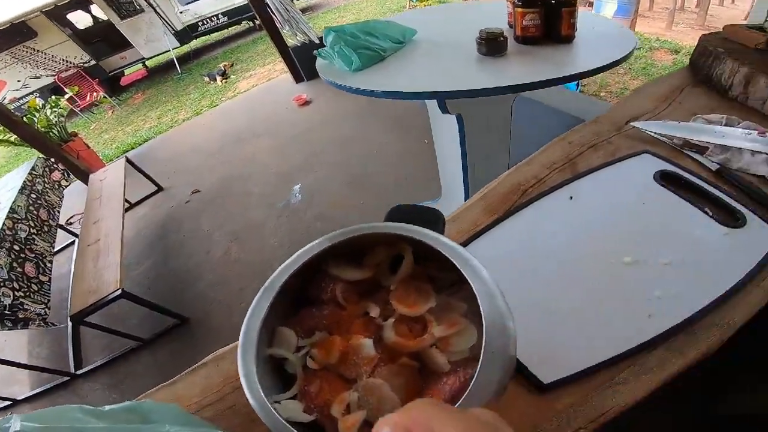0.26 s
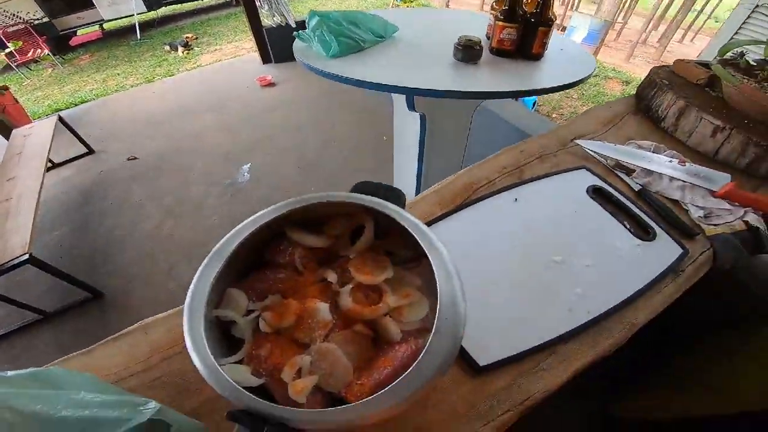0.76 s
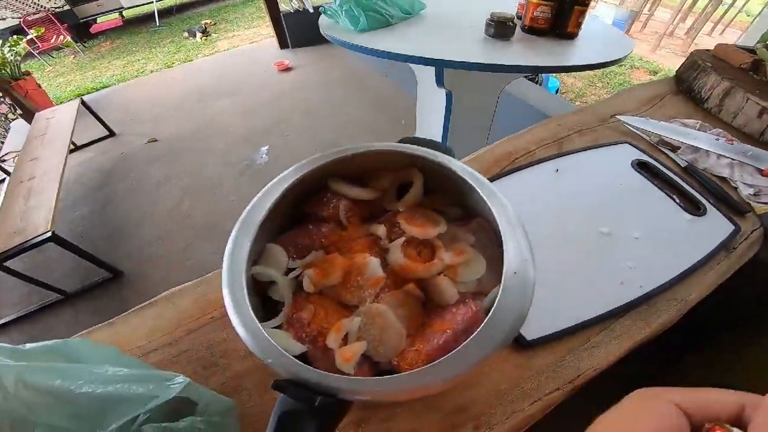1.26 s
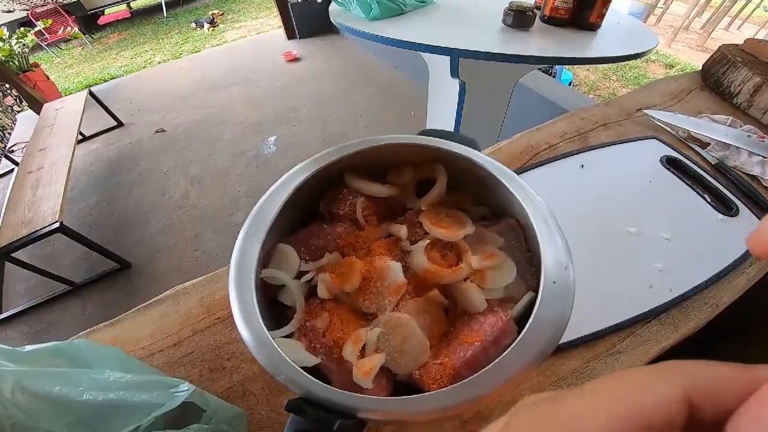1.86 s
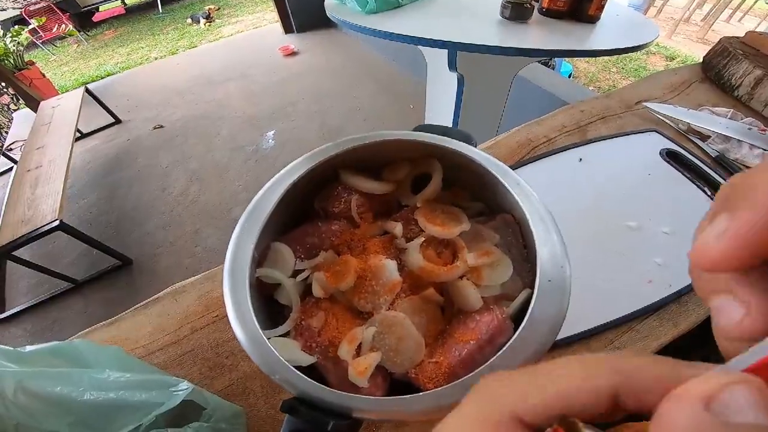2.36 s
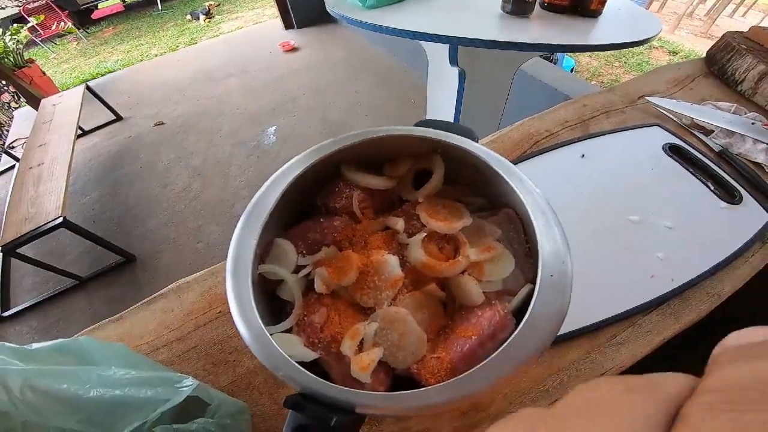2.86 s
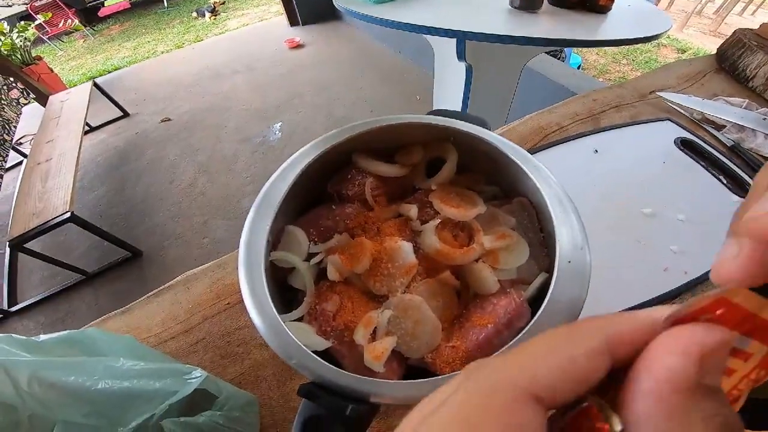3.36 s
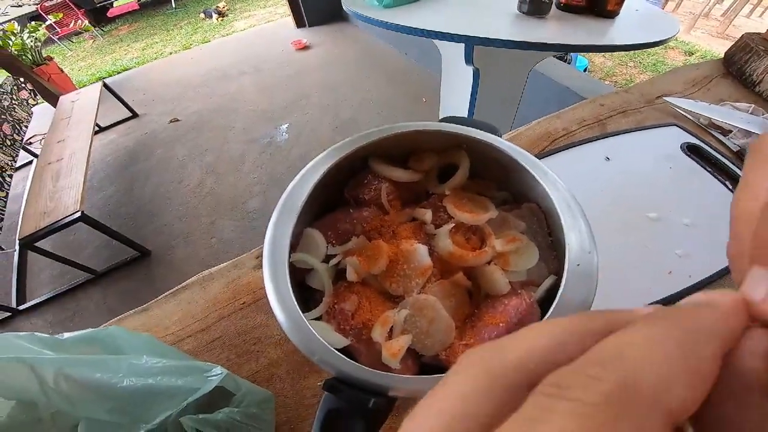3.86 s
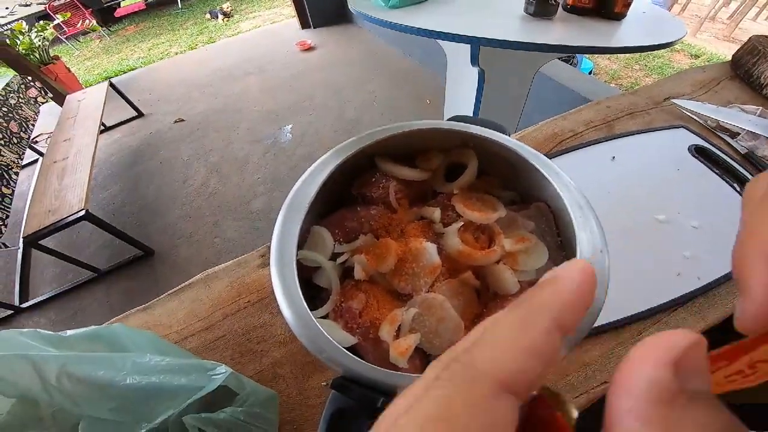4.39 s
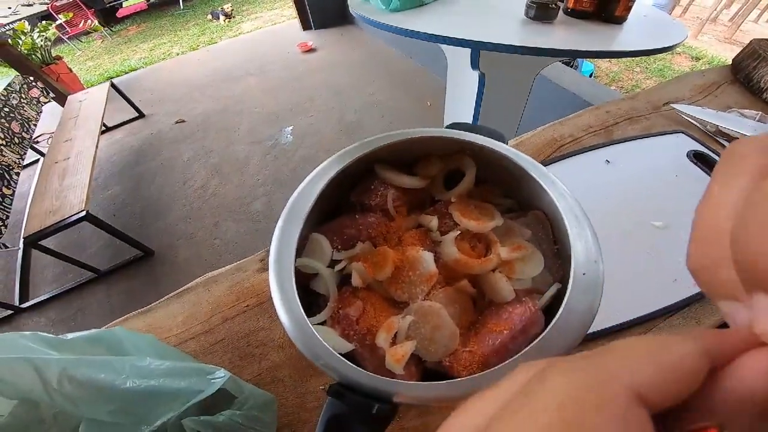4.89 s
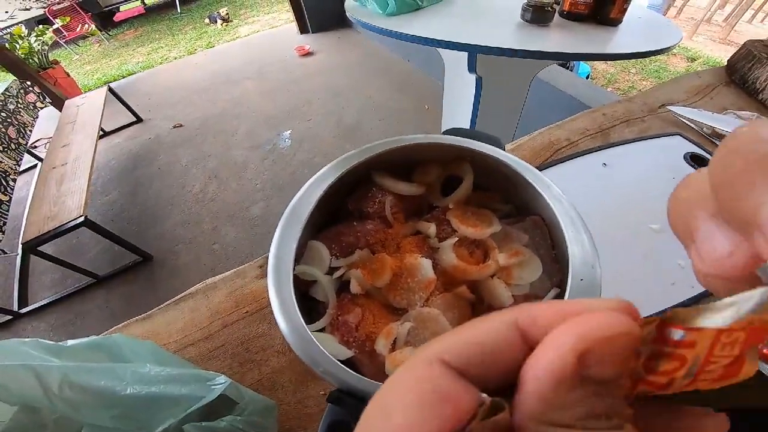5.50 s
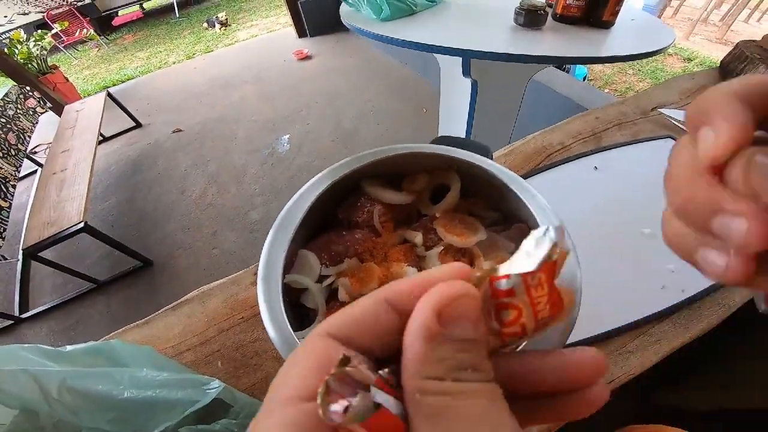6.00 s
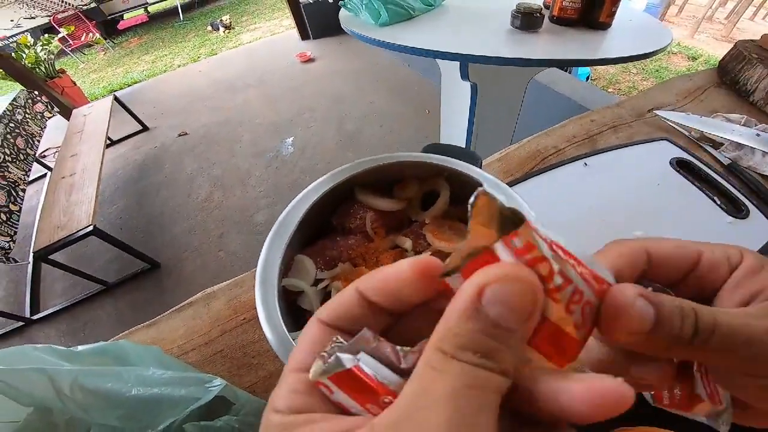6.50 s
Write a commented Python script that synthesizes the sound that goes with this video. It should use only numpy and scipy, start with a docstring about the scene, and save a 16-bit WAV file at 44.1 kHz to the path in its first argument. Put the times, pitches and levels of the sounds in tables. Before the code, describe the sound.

Sparse foil ticks open the scene, followed by soft, deep bumps and brief rubbing against the camera. Then fingers squeeze and tear the thin packet: irregular runs of fine bright crackle punctuated by hard little snaps, a thinner patch in the middle, and a thick flurry later. Close, dry, right-leaning stereo with short porch reflections and very quiet outdoor noise.

```python
"""On an open porch, hands crease and tear open a small foil sachet close to a body-worn two-port camera microphone.
Each squeeze of the fingers sets off a run of fine crackle, made of many tiny ringing facets; large facets buckle
with sharp snaps and drag their neighbours along. Dull knocks (low modes) and cloth rubbing (rumble and friction
noise) reach the camera through its mount. Sliding swishes, short reflections and faint outdoor air lie underneath."""
import sys
import numpy as np
from scipy import signal
from scipy.fft import rfft, irfft, next_fast_len
from scipy.io import wavfile
from scipy.ndimage import uniform_filter1d

SR = 44100
rng = np.random.default_rng(int(sys.argv[2]) if len(sys.argv) > 2 else 0)


def transcribe(u):
    """Save the signal u as a 16-bit wav file named by the first command-line argument.

    u: samples, shape (n,) or (channels, n), limited to [-1, 1]; the rate is SR.
    q: integer samples, one column per channel.
    """
    v = np.clip(np.atleast_2d(u).T, -1, 1)
    q = np.round(v * 32767).astype(np.int16)
    wavfile.write(sys.argv[1], SR, q)


N = 297542
TIME = np.arange(N) / SR

# large facets buckling: t/s, relative energy level/dB, facet resonance f/Hz
FACET_SNAPS = [(0.0106, -15, 2760), (0.0817, -18, 3160), (0.1129, -3.5, 4230), (0.123, -8.5, 2830.0),
               (0.2791, -10, 4970), (0.3073, -4, 5070), (0.3514, -12, 2730), (0.392, -12, 6050),
               (0.5343, -10, 4570), (0.666, -12.5, 1300), (0.7059, -11.5, 5530), (1.204, -12, 1280),
               (1.2292, -16, 1350), (1.245, -9.5, 1180), (1.4316, -18.5, 4370), (1.5, -15.5, 3270),
               (1.527, -12, 5200), (1.5957, -12, 3640.0), (1.6142, 1.5, 4000), (1.682, -3, 3700),
               (1.6873, 1, 5550), (1.7038, -11.5, 4400), (1.7143, -10, 2900), (1.7689, -2.5, 2650),
               (1.7961, 2, 4030), (1.8628, 0.5, 3300), (1.9241, -7, 3220), (1.9628, -5.5, 3060),
               (1.9934, -12.5, 4700), (2.0155, -4, 3540.0), (2.0759, -1.5, 3200), (2.1115, -9.0, 3250),
               (2.1263, -5, 2380), (2.1336, -6.5, 5220.0), (2.1447, 3, 5220.0), (2.16, -1.5, 3440.0),
               (2.1877, -4.5, 2470), (2.2137, -3.5, 2500), (2.2348, -10, 4810.0), (2.2451, 2.5, 2500),
               (2.3502, -9.5, 5080.0), (2.3988, -5.5, 4870), (2.4676, 1.5, 4050), (2.509, -15.5, 6170.0),
               (2.5458, -2, 6740), (2.5593, 2.5, 3350.0), (2.5951, -6.5, 3260.0), (2.626, -0.5, 4810.0),
               (2.6412, -2, 4940.0), (2.6565, -4.5, 4940.0), (2.7139, -6, 5680.0), (2.7245, -5.5, 5410),
               (2.7736, -5.5, 2040), (2.8196, -2.5, 4100), (2.8405, -9, 6000.0), (2.8616, -1.5, 4700),
               (2.934, -6.5, 5840.0), (2.96, -8, 4550.0), (2.9684, -6, 3960.0), (3.038, -2.5, 3540.0),
               (3.1163, -9, 4440), (3.1324, -1, 2120), (3.1405, 1.5, 3900), (3.17, -0.5, 1520),
               (3.1809, 6, 2040), (3.1919, 0.5, 2100), (3.2011, -3.5, 3670), (3.301, -9.5, 3800),
               (3.3482, -12, 3230), (3.3668, -12.5, 3150), (3.551, -11, 4400), (3.6206, -8, 3170.0),
               (3.6363, -5.5, 3240), (3.669, -3.5, 3180), (3.6927, -6.5, 5150), (3.7164, -5.5, 5120),
               (3.917, -3.5, 5100), (3.987, -8, 5680.0), (4.0301, -9.0, 1920.0), (4.0725, -7.5, 5800),
               (4.171, -11.5, 5170), (4.3918, -5, 7400), (4.4674, -11, 1456), (4.4958, -2.5, 4260),
               (4.6156, -1, 6100), (4.6485, -14, 4030), (4.657, -7.5, 5680.0), (4.7931, -8, 5830),
               (4.8422, -8, 4810.0), (4.8507, -6, 7440), (4.857, -2.0, 6400), (4.9234, -1.5, 4600),
               (4.9347, 1, 3800), (4.9988, -2.5, 5080.0), (5.015, -6, 4130), (5.0569, -3, 5900),
               (5.0678, -10, 5520.0), (5.0879, 1, 5840.0), (5.0947, -2, 4400), (5.1163, 1, 3260.0),
               (5.1359, 1.5, 6100), (5.151, -2, 3850.0), (5.1855, -5.0, 4810.0), (5.2495, -7, 3220),
               (5.2682, 0.5, 5160), (5.2817, 1.5, 3870), (5.3, -9, 5250), (5.319, -4, 5080.0),
               (5.3559, -1, 3100), (5.4026, -2, 3170.0), (5.412, -5, 3960.0), (5.4202, -6.5, 4300.0),
               (5.441, -5, 2910.0), (5.4511, -4, 3740.0), (5.4734, 3, 3600), (5.5094, -4.5, 3140),
               (5.531, -5, 3330), (5.5521, 0, 5940), (5.635, 3, 2830.0), (5.6496, -0.5, 2170),
               (5.674, -9, 7500.0), (5.706, -4, 4500), (5.754, -10, 5520.0), (5.771, -10.5, 4570),
               (5.8324, -12.5, 2400), (5.8564, -5.5, 2560), (5.8853, 3, 2840), (5.8916, 3.5, 3050),
               (5.897, -1.5, 2450), (5.964, -8.5, 5650), (6.024, -14.5, 2640), (6.12, -3, 3050),
               (6.257, -6, 4670.0), (6.2684, -0.5, 5080.0), (6.346, -0.5, 4070.0), (6.4156, -3.5, 3800),
               (6.42, -3.5, 1270), (6.4449, -14, 4300), (6.5654, -6, 2640), (6.591, -1.5, 3130),
               (6.6187, -5, 3220), (6.6844, -6, 4400)]
# spectrum of foil close to the microphone: f/Hz, relative level/dB
FOIL_SPECTRUM = [(100, 4.5), (300, -4.5), (700, -1), (1000, -1.5), (1450, 1), (2100, -2.5), (3200, -6),
                 (3950, -11), (5000, -6), (6400, -3.5), (7900, -8.5), (9900, -13), (12500, -24.5),
                 (16000, -26.5)]
# place of the hands, heard as left port over right: t/s, level/dB
HANDS_PLACE = [(0, -5), (1.5, -7), (3, -7), (4, -5), (5.3, -6), (6, -4.5), (6.7, -1.5)]


def sachet():
    """Snaps over fine crackle, as they radiate in one direction."""
    return from_db(-0.5) * snaps() + crackle(middle_db=0.5, treble_db=0.5) * loading()


def snaps():
    """Each large facet flips once and rings briefly at its own pitch."""
    out = np.zeros(N + SR)
    forces = buckle(len(FACET_SNAPS), flutter=0.26)
    rings = np.array([facet(force, hz, overtone=0.59, rebound=1.0)
                      for force, (s, db, hz) in zip(forces, FACET_SNAPS)])
    rings = colour(rings, FOIL_SPECTRUM)
    for (s, db, hz), ring in zip(FACET_SNAPS, rings):
        at = max(round(s * SR), 0)
        out[at:at + len(ring)] += from_db(db) * ring / np.linalg.norm(ring)
    return out[:N]


def facet(force, hz, overtone, rebound):
    """A facet rings at its pitch and at a chance overtone; its far crease gives way a moment later."""
    overtone_hz = hz * 2 ** rng.uniform(-0.814, 1)  # may also fall below the main pitch
    ring = resonate(force, hz, q=1.92) + overtone * resonate(force, overtone_hz, q=8.5)
    strength = rebound * rng.uniform(-0.62, 1)
    delay = rng.integers(8, 36)  # samples
    return ring + strength * np.pad(ring, (delay, 0))[:len(ring)]


def buckle(count, flutter, size=512):
    """Force of buckling facets: a sharp flip, then a flutter that falls by 60 dB in 8 ms."""
    decay = from_db(-60 * np.arange(size) / SR / 0.008)
    force = flutter * rng.standard_normal((count, size)) * decay
    force[:, 0] += 1
    return force


def crackle(middle_db, treble_db):
    """Harder squeezing makes the crackle louder and denser; each grip has its own pitch and share of treble."""
    # fingers squeezing or pulling: start t/s, length/s, relative level/dB, treble over middle level/dB,
    # swell from start to end level/dB, resonance of the stretch of foil f/Hz
    grips = [(0.0, 0.013, -38.5, -2, -1.5, 3880), (0.055, 0.1, -41, -9, -6.0, 3800),
             (0.186, 0.04, -45.5, 1, 9, 2150), (0.25, 0.18, -53, 6, 1, 2720),
             (1.494, 0.041, -45.5, -3, 9.5, 2180), (1.583, 0.028, -32.0, 2, -0.5, 2730),
             (1.741, 0.1, -36.5, -2, -0.5, 3300), (1.858, 0.032, -33.5, 4, 2.0, 3880),
             (1.915, 0.15, -48.5, -1.5, -3.5, 2700), (2.068, 0.082, -42, -6, 18.5, 2360),
             (2.209, 0.094, -38, 6, -4, 1980), (2.328, 0.077, -42, 3.5, 3.5, 2130),
             (2.497, 0.15, -35.5, 3.0, 4, 2660), (2.68, 0.043, -36.5, 3, -0.5, 1630),
             (2.743, 0.147, -36.5, 2.5, -3.5, 1650), (2.89, 0.056, -41.5, 3.0, -5.5, 1760),
             (2.943, 0.053, -29.5, 3.5, -2.5, 2960), (3.039, 0.08, -40, 0, -13, 1820),
             (3.124, 0.084, -31.5, 1.5, -7.5, 1630), (3.33, 0.064, -42, -2, -2, 1740),
             (3.442, 0.065, -43, -0.5, 0, 2420), (3.626, 0.0096, -38, -6, 5.5, 1310),
             (3.661, 0.079, -41.5, 3, 3.5, 1310), (3.771, 0.17, -41, 2.5, 15.0, 3050),
             (3.982, 0.055, -46.5, 9, 9, 1310), (4.153, 0.024, -38, 2.5, -8.0, 1410),
             (4.203, 0.074, -39.5, -1.5, 9.5, 2870), (4.304, 0.097, -39, 2.5, 1.5, 1300),
             (4.427, 0.085, -34.5, 3.5, -1.5, 1370), (4.537, 0.13, -39.5, 0, -9, 1360),
             (4.828, 0.055, -38.5, 1.5, 7, 1420), (4.9, 0.052, -33.5, -5, -6, 1630),
             (4.98, 0.05, -47.5, 4, 2, 1920), (5.047, 0.2, -44, 3, -1, 2800),
             (5.23, 0.13, -38.0, 2, 5, 3520), (5.361, 0.165, -33, -2, 11, 2840),
             (5.591, 0.086, -38.5, 7, -4, 3480), (5.69, 0.1, -51.5, -4, 11, 1920),
             (5.827, 0.019, -39.5, -11, -6.5, 2880), (5.88, 0.011, -29.0, -2.5, 7.5, 2460),
             (6.012, 0.087, -45, 4.5, 7, 2660), (6.107, 0.085, -35, -3.5, -7.5, 2770),
             (6.204, 0.1, -38.5, 7, 0.5, 3300), (6.307, 0.081, -35.5, -0.5, 5.5, 3340),
             (6.408, 0.099, -44.5, -3, -6, 3880), (6.532, 0.14, -41, -3, 8.5, 3150)]
    held_db = -58.5  # foil that is only held still ticks faintly
    grains_per_s, rate_exponent = 560, 0.45  # rate at mean power; rate against power
    panel_q, panel_db = 5.3, 5.5  # the stretch of foil between the fingers rings

    loose = from_db(held_db) ** 2 + avalanches()
    power = loose.copy()
    for start, length, db, bright_db, swell_db, hz in grips:
        span, envelope = squeeze(start, length, swell_db)
        power[span] += (from_db(db) * envelope) ** 2
    rate = grains_per_s * (power / np.mean(power)) ** rate_exponent

    middle = grains(rate, 1510, 4550, spread_db=7.0)
    treble = grains(rate, 4060, 6270, spread_db=6.5)
    out = np.sqrt(loose) * grains(rate, 2170, 6300, spread_db=5.0)
    for start, length, db, bright_db, swell_db, hz in grips:
        span, envelope = squeeze(start, length, swell_db)
        panel = middle[span] + from_db(panel_db) * resonate(middle[span], hz, panel_q)
        panel *= np.std(middle[span]) / (np.std(panel) + 1e-12)  # the resonance colours, the level stays
        tilt = from_db(bright_db)
        mix = from_db(db + middle_db) * panel + from_db(db + treble_db) * tilt * treble[span]
        out[span] += envelope * mix / np.hypot(1, tilt)
    return out


def squeeze(start, length, swell_db):
    """Span and envelope of one squeeze: it takes hold, swells or slackens, and dies away on release."""
    grip_s, let_go_t60_s = 0.0068, 0.11
    span = slice(*np.searchsorted(TIME, [start, start + length + let_go_t60_s]))
    t = TIME[span] - start
    hold_db = swell_db * (np.minimum(t / length, 1) - 0.5)
    release_db = -60 * np.maximum(t - length, 0) / let_go_t60_s
    return span, np.minimum(t / grip_s, 1) * from_db(hold_db + release_db)


def grains(per_s, low_hz, high_hz, spread_db, count=160):
    """Tiny facets flip at random, in uneven sizes and many pitches; the slow level is evened out."""
    pitches = np.geomspace(low_hz, high_hz, count)
    forces = buckle(count, flutter=0.23)
    rings = np.array([facet(force, hz, overtone=1.0, rebound=0.53) for force, hz in zip(forces, pitches)])
    rings /= np.linalg.norm(rings, axis=1, keepdims=True)

    born = np.flatnonzero(rng.random(N) < per_s / SR)
    sizes = from_db(spread_db * np.minimum(rng.exponential(1, N), 3.2))
    sizes *= rng.choice([-1, 1], N)
    chosen = rng.integers(0, count, N)[born]
    flips = sizes[born, None] * rings[chosen]
    places = born[:, None] + np.arange(rings.shape[1])
    out = np.bincount(places.ravel(), flips.ravel(), N)[:N]

    out = rms_one(colour(out, FOIL_SPECTRUM))
    power = uniform_filter1d(uniform_filter1d(out ** 2, size=1100), size=1100)  # 25 ms, twice
    return out / np.sqrt(np.abs(power) + 0.0071)  # the floor keeps sparse stretches quiet


def avalanches():
    """Power of the crackle that each snap sets off in the creases around it."""
    level_db, decay_s = -33.5, 0.004  # relative to the snap's table level; power falls to 1/e
    power = np.zeros(N)
    for s, db, hz in FACET_SNAPS:
        after = slice(*np.searchsorted(TIME, [s, s + 0.05]))
        power[after] += from_db(db + level_db) ** 2 * np.exp((s - TIME[after]) / decay_s)
    return power


def loading():
    """Gain of the crackle: the foil tenses and falls slightly quieter just before a large facet gives way."""
    lull_db, lull_s = -0.5, 0.016
    starts = np.sort([s for s, db, hz in FACET_SNAPS] + [2 * TIME[-1]])
    wait = starts[np.searchsorted(starts, TIME)] - TIME  # until the next snap
    return from_db(lull_db * np.exp(-(wait / lull_s) ** 2))


def knocks(scuff_t60):
    """A soft contact swells into one low mode and scuffs as it lands."""
    # dull knocks on the camera and the hands: t/s, level/dB, mode f/Hz, scuff relative to the mode level/dB
    contacts = [(0.514, -4.5, 60.2, -20.5), (.661, -11.5, 154, -19.5), (0.898, -14, 68.5, -14.5),
                (1.173, -19.5, 154, -27), (1.200, -27, 180, -14), (1.241, -19.5, 148, -21),
                (1.328, -15.5, 145.5, -32), (3.176, -34.5, 152, -1.5), (4.082, -30.5, 106, -20),
                (4.085, -33, 41.2, -30), (5.521, -29, 342, -12), (5.648, -18.5, 400, -15),
                (5.885, -35.5, 168, -1.5)]
    # spectrum of the scuff: f/Hz, relative level/dB
    scuff_spectrum = [(40, -48), (100, -13), (200, 5), (420, -4), (700, -22), (1400, -12), (2400, -36),
                      (6000, -28.5), (12000, -59)]
    rise_cycles, ring_cycles = 1.14, 11.1  # lower knocks are softer and ring longer
    out, scuff = np.zeros(N), noise(scuff_spectrum)
    for s, db, hz, scuff_db in contacts:
        rise, t60 = rise_cycles / hz, ring_cycles / hz
        span = (TIME >= s) & (TIME < s + 0.5)
        t = TIME[span] - s
        swell = np.minimum(t / rise, 1) ** 2
        after = np.maximum(t - rise, 0)
        mode = np.sin(2 * np.pi * hz * t) * from_db(-60 * after / t60)
        contact = scuff[span] * from_db(scuff_db - 60 * after / scuff_t60)
        out[span] += from_db(db) * swell * (mode + contact)
    return out


def rubbing(q, body_db):
    """Each drag swells and stops: mount rumble and friction with a hollow resonance, separate at each port."""
    # cloth and skin dragging over the camera: t/s, length/s, rumble level/dB (right port),
    # friction relative level/dB, hollow f/Hz
    drags = [(0.35, 0.14, -44, -72, 305), (0.573, 0.14, -33, -53, 1440), (0.653, 0.025, -42, -44.5, 1440),
             (0.679, 0.11, -39.5, -61, 1290), (0.791, 0.045, -36.5, -52.5, 1190),
             (0.83, 0.14, -29.5, -41.5, 1230), (0.942, 0.3, -45.5, -66.5, 1310),
             (1.183, 0.14, -39, -49, 1700), (1.239, 0.016, -47, -40, 1590), (1.319, 0.07, -38, -70, 1500),
             (2.752, 0.13, -63, -67, 302), (2.944, 0.041, -79, -42, 568), (3.132, .08, -62, -45, 198),
             (3.964, 0.087, -56, -45.5, 291), (4.04, .11, -39, -48.5, 279), (4.629, 0.14, -82, -57, 282),
             (6.062, 0.026, -52, -75, 300)]
    # spectrum of the mount rumble: f/Hz, relative level/dB
    rumble_spectrum = [(15, -14), (35, 4), (70, 5.5), (120, -4.5), (185, 0), (280, -27.5), (450, -19.5),
                       (1000, -83)]
    # spectrum of the friction: f/Hz, relative level/dB
    friction_spectrum = [(100, -4), (200, 10), (410, 3), (600, -6.5), (900, -6.5), (1600, -6), (2200, -10),
                         (6500, -17), (14000, -55)]
    out = np.zeros((2, N))
    rumble = np.array([noise(rumble_spectrum), noise(rumble_spectrum)])
    rumble *= from_db([[-9], [0]])  # left, right
    body = np.array([noise(friction_spectrum), noise(friction_spectrum)])
    for s, length, rumble_db, friction_db, hz in drags:
        span = (TIME >= s) & (TIME < s + length)
        stroke = np.sqrt(2) * np.sin(np.pi * ((TIME[span] - s) / length) ** 0.97)
        white = rng.standard_normal((2, SR // 2))
        hollow = rms_one(resonate(resonate(white, hz, q), hz, q))
        hollow = hollow[:, -len(stroke):]  # the end, where the resonance has settled
        friction = (hollow + from_db(body_db) * body[:, span]) / np.sqrt(2)
        out[:, span] += stroke * (from_db(rumble_db) * rumble[:, span] + from_db(friction_db) * friction)
    return out


def swishes():
    """Narrow bands of noise swell, glide in pitch and fade."""
    # soft swishes and squeaks of things sliding, and one faint thin tone near 3.7 kHz at 0.37 s: t/s, length/s,
    # start f/Hz, end f/Hz, width f/Hz, relative level/dB
    slides = [(0.101, 0.015, 4280, 3440, 600, -32), (0.367, 0.12, 3660, 3730, 120, -57),
              (0.579, 0.33, 4400, 2820, 600, -59.5), (0.937, 0.29, 5100, 3380, 800, -55),
              (1.48, 0.9, 2250, 2247, 500, -60), (3.19, 0.27, 1896, 2354, 795, -55.5),
              (5.241, 0.34, 2080, 2930, 1200, -61)]
    out = np.zeros((2, N))
    for s, length, from_hz, to_hz, width, db in slides:
        along = np.clip((TIME - s) / length, 0, 1)
        lowpass = signal.butter(2, width / 2, fs=SR, output="sos")
        band = rms_one(signal.sosfilt(lowpass, rng.standard_normal((2, N))))
        phase = 2 * np.pi * np.cumsum(from_hz * (to_hz / from_hz) ** along) / SR
        swell = np.sqrt(2 * np.abs(np.sin(np.pi * along)))
        out += from_db(db) * swell * band * np.cos(phase)  # the carrier moves the band up to its pitch
    return out


def reflections(x, delay, t60, level_db):
    """A diffuse dying tail, different at each port."""
    t = TIME[:SR // 2]
    tail = rng.standard_normal((2, len(t))) * (t > delay) * from_db(-60 * t / t60)
    tail /= np.linalg.norm(tail, axis=1, keepdims=True)
    return from_db(level_db) * signal.oaconvolve(x[None], tail, axes=1)[:, :N]


def air(alike):
    """Distant outdoor noise, partly shared by the two ports."""
    # spectrum of the outdoor air: f/Hz, relative level/dB
    air_spectrum = [(25, -12), (90, -19.5), (130, -6), (190, 1), (300, -5), (500, -13.5), (1000, -15.5),
                    (2500, -14), (6000, -16), (8000, -21.5), (11000, -37), (16000, -51)]
    alike = np.clip(alike, 0, 1)  # shared part of the power
    own = np.array([noise(air_spectrum), noise(air_spectrum)])
    return from_db(-55.5) * (np.sqrt(alike) * noise(air_spectrum) + np.sqrt(1 - alike) * own)


def ports(x):
    """The sound comes from the right; the left channel comes out shaded and shifted in phase against it."""
    # left port against right: f/Hz, phase lead/rad
    phase_lead = [(20, -7.5), (340, 1.5), (860, 1.5), (1600, 2.0), (2400, 1.47), (4000, -0.15), (5000, -2),
                  (6600, -1.5), (9000, -3), (16000, -5.5)]
    # left port against right, before the place of the hands: f/Hz, level/dB
    shade = [(50, -5), (180, -9.5), (400, 0.5), (1300, -3.5), (2500, -4), (5000, -9), (7000, 1),
             (10000, -1), (16000, -13)]
    size = next_fast_len(N + SR // 10)
    hz = np.fft.rfftfreq(size, 1 / SR)
    response = from_db(at_hz(shade, hz)) * np.exp(1j * at_hz(phase_lead, hz))
    left = irfft(rfft(x, size) * response, size)[:N]
    return np.array([left * from_db(in_time(HANDS_PLACE)[0]), x])


def from_db(db):
    """Decibels to an amplitude factor."""
    return 10 ** (np.asarray(db) / 20)


def rms_one(x):
    """Scale to rms 1."""
    return x / np.sqrt(np.mean(x ** 2) + 1e-20)


def in_time(rows):
    """The columns of a curve at every sample."""
    s, *columns = np.transpose(rows)
    return [np.interp(TIME, s, c) for c in columns]


def at_hz(points, hz):
    """Read a spectrum on a log-frequency axis."""
    f, value = np.transpose(points)
    return np.interp(np.log(np.maximum(hz, 1)), np.log(f), value)


def colour(x, spectrum):
    """Causal (minimum-phase) filter with the given spectrum, along the last axis."""
    n = x.shape[-1]
    size = 2 * next_fast_len(n // 2 + 1)
    gain = from_db(at_hz(spectrum, np.fft.rfftfreq(size, 1 / SR)))
    cepstrum = irfft(np.log(gain))
    cepstrum[1:size // 2] *= 2  # folding the cepstrum forward makes the phase minimal
    cepstrum[size // 2 + 1:] = 0
    return irfft(rfft(x, size) * np.exp(rfft(cepstrum)), size)[..., :n]


def noise(spectrum):
    """Coloured noise of rms 1."""
    return rms_one(colour(rng.standard_normal(N), spectrum))


def resonate(x, hz, q):
    """One resonance with gain 1 at its peak."""
    hz = min(hz, SR / 4)
    return signal.lfilter(*signal.iirpeak(hz, max(q, 1), fs=SR), x + 1e-18)


def scene():
    """Foil and knocks at both ports, with porch reflections, rubbing, swishes and air."""
    # foil sound that only the left port catches, radiated to that side: f/Hz, relative level/dB
    sideways = [(500, -32), (1500, -13), (3000, -6), (6000, -13.5), (10000, 3.5), (16000, 0.5)]
    foil = sachet()
    direct = ports(foil + knocks(scuff_t60=0.13))
    # crumpled foil sounds different from each side: the left port adds its own draw of grains and rings
    direct[0] += from_db(in_time(HANDS_PLACE)[0]) * colour(sachet(), sideways)
    porch = reflections(foil, delay=0.0063, t60=0.19, level_db=-24)
    sliding = swishes() * from_db([[-3], [2]])  # left, right
    return direct + porch + rubbing(q=7.6, body_db=2.5) + sliding + air(alike=0.6)


def record(dry):
    """The microphone signal is cut steeply above 16.3 kHz."""
    lowpass = signal.ellip(10, 0.1, 80, 16300, fs=SR, output="sos")
    return signal.sosfilt(lowpass, dry)


dry = scene()
out = record(dry)
transcribe(out)
```